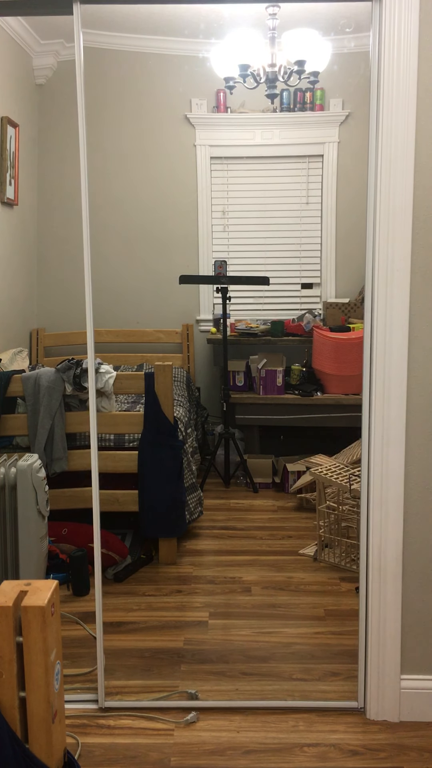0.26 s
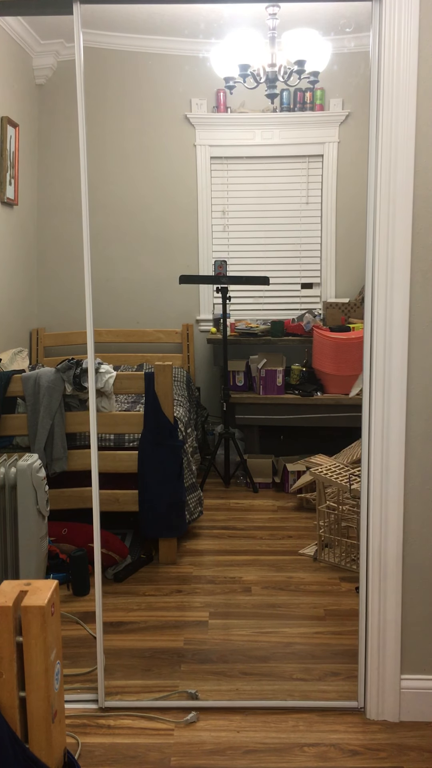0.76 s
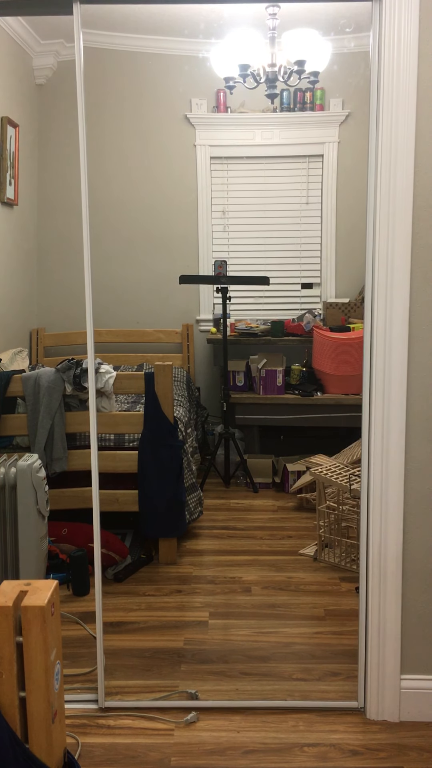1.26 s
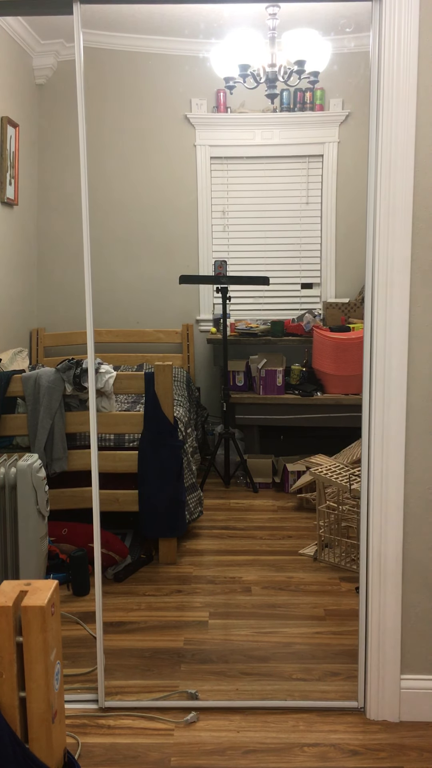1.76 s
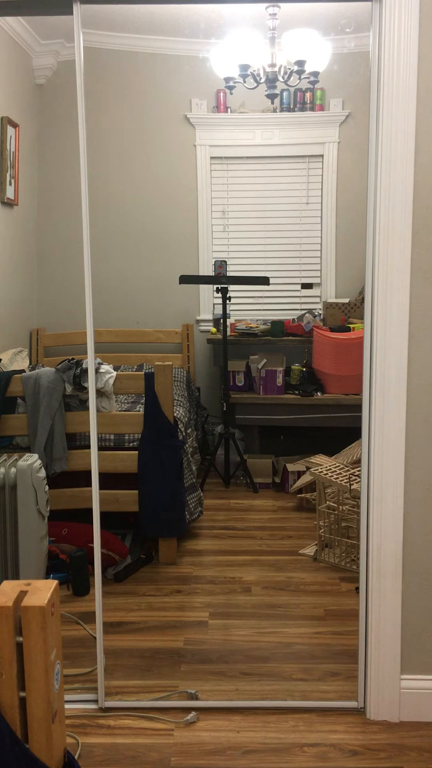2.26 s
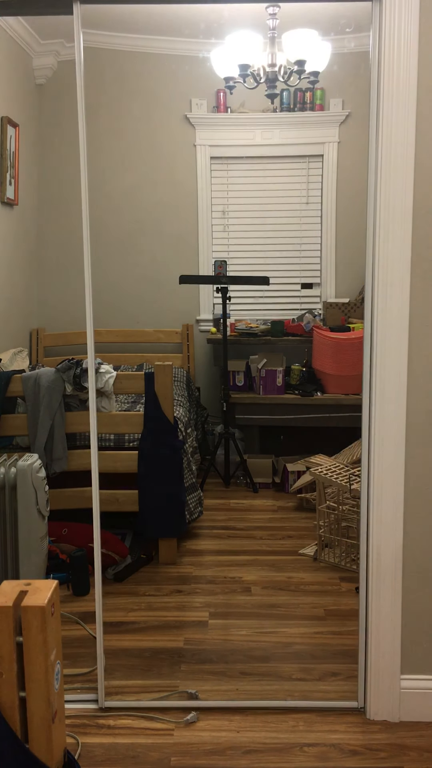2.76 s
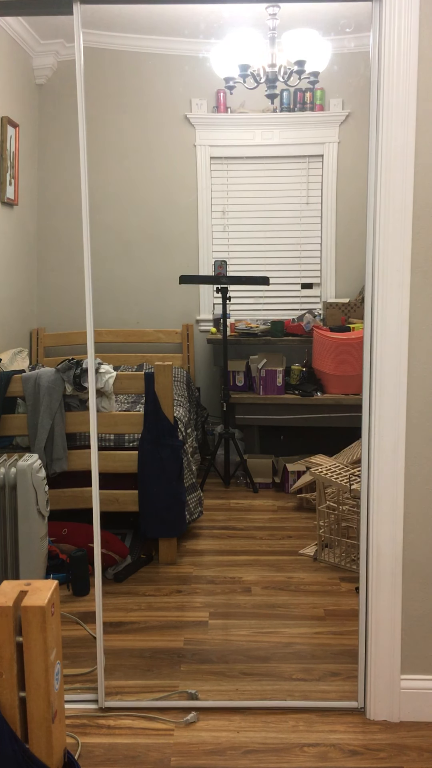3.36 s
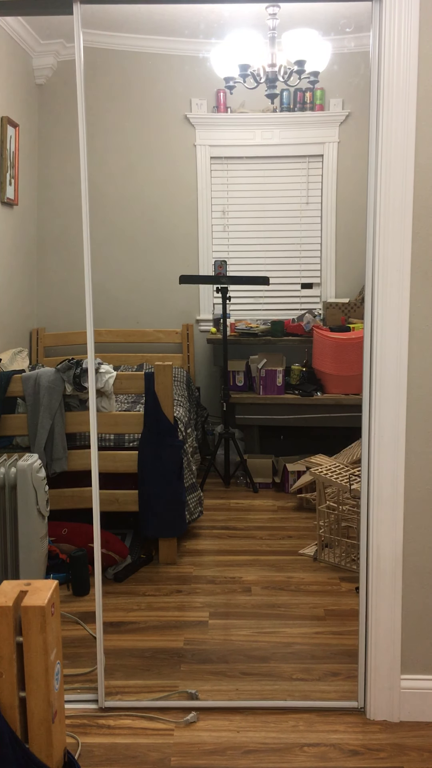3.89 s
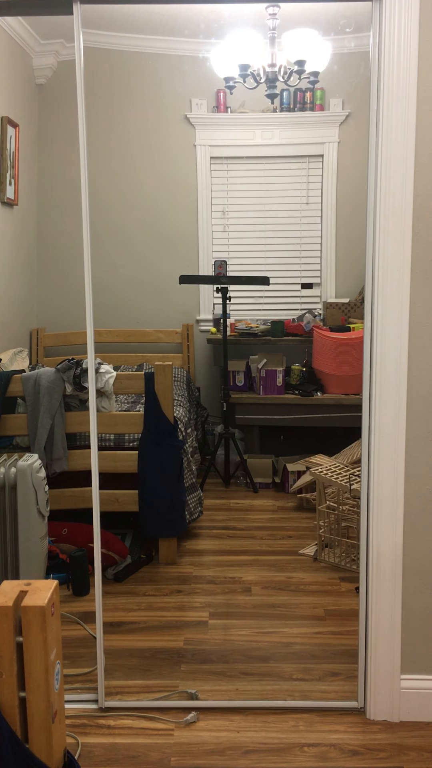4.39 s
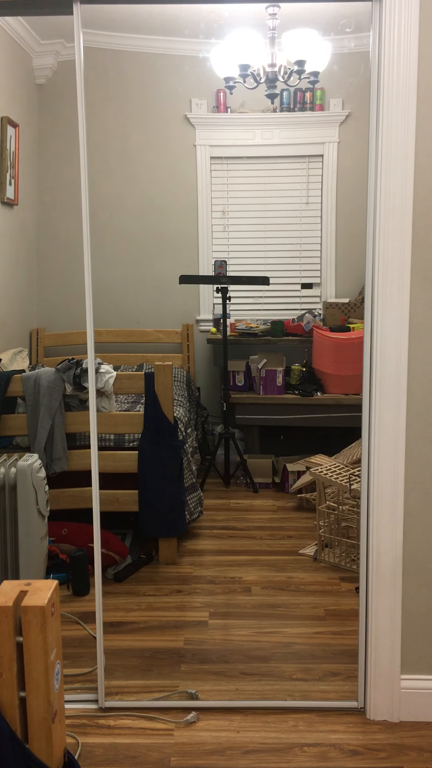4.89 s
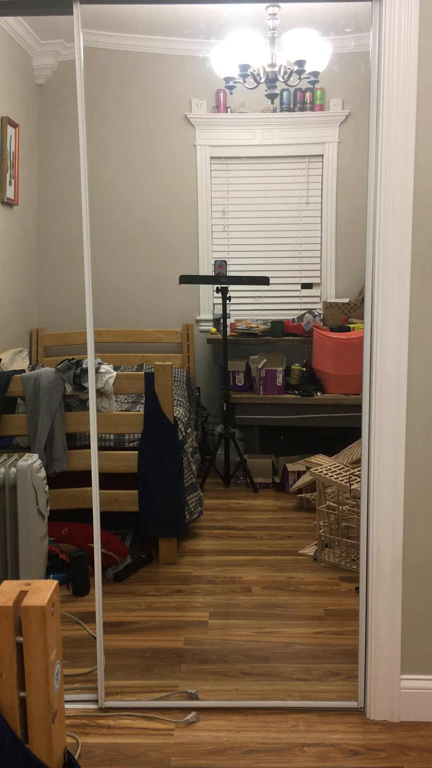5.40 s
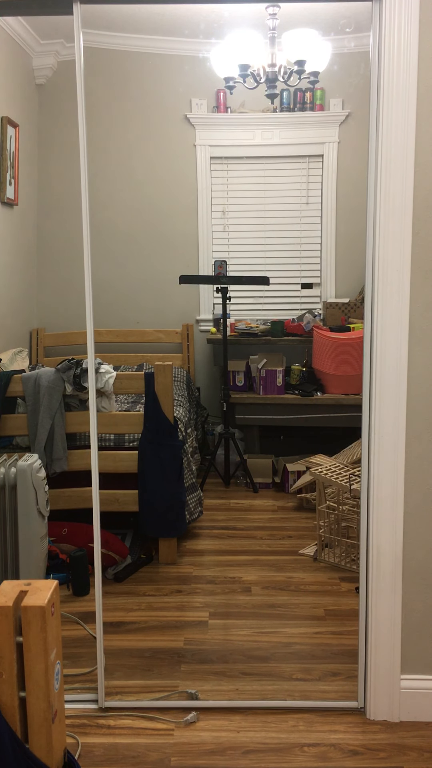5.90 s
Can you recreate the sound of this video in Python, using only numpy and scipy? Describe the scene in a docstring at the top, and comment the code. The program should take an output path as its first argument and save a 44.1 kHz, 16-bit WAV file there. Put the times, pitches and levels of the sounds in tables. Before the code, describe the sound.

Shoes knock and scuff on floorboards, at first in a quick cluster, then more lightly and sparsely. A firm knock comes just before one loud, deep thump as a person lands and shakes the furniture. Another knock and a few soft bounces of the floor follow, and things go quiet. The small room rings briefly with each contact, heard through one microphone with a faint hiss and rustling clothes behind it.

```python
"""Footsteps knock and scuff on a wooden floor in a small, quiet room, then someone lands with a heavy thump.
Each contact is a burst of tiny clicks that sets the boards and the room ringing.
The landing shakes the furniture and makes the joists (the beams under the floor) boom, and the floor
bounces a few times before it settles. Small things chink, a sole squeaks, and behind it all
are a faint hiss, a trembling floor and rustling clothes."""
import sys
import numpy as np
from scipy import signal
from scipy.fft import rfft, irfft
from scipy.io import wavfile

SR = 44100
rng = np.random.default_rng(int(sys.argv[2]) if len(sys.argv) > 2 else 0)


def wav_out(sig):
    """Save sig, one row per channel (or a flat mono array), as 16-bit PCM at SR to the path in sys.argv[1]."""
    wavfile.write(sys.argv[1], SR, np.round(np.clip(np.atleast_2d(sig).T, -1, 1) * 32767).astype(np.int16))


N = 270855

# Feet striking the boards. Each row: start in seconds, contact time in seconds, clack level in dB,
# brightness in dB per octave, weight in dB, board pitch in Hz, struck spot's pitch in Hz, its level in dB.
FOOTFALLS = [ (0.006, 0.019, -47.5, 0, -42, 315.7, 2480, -48),
             (0.232, 0.0067, -77, 2.5, -63.5, 303, 500, -61), (0.385, .008, -83, 0, -61.5, 148, 1300, -85),
             (0.434, 0.018, -82, 7, -69, 143, 1300, -80), (0.519, 0.02, -45, -0.24, -51, 287, 1400, -40.5),
             (0.560, 0.0066, -47.5, 0, -44.5, 306, 2730, -50),
             (0.625, 0.011, -58, 1.5, -43.5, 301, 880, -45), (0.695, .020, -59, 2.5, -61, 113, 1110, -51),
             (0.785, .012, -69, -3, -50.5, 304.7, 785, -63),
             (0.904, 0.0027, -68.5, -3.5, -51, 134.3, 583, -56.5),
             (0.963, 0.0034, -95.5, 11, -55.5, 111.6, 586, -72),
             (1.232, 0.0033, -65, 0, -55.5, 323.5, 865, -55),
             (1.328, 0.0029, -72, -6, -59, 142.6, 980, -61),
             (2.231, 0.0012, -48.5, 2, -45.5, 184.7, 1140, -48),
             (2.391, .004, -66, -2.5, -60, 139.5, 575, -72), (2.750, 0.012, -66.5, -1, -56, 148, 344, -58),
             (2.884, .022, -72, 0.5, -63.5, 147, 490, -61.5),
             (3.173, 0.0023, -43.5, 0.24, -37, 306.7, 444.6, -36.5),
             (3.457, 0.0097, -56, 1, -65, 175, 2450, -54), (3.468, 0.0029, -44.5, 3.5, -44, 185, 2420, -50),
             (3.674, 0.0087, -52.5, -1.5, -35.5, 194.5, 400, -44)]
# Soles sliding. Each row: start in seconds, length in seconds, level in dB,
# brightness in dB per octave, weight in dB.
SCUFFS = [ (0.458, 0.12, -55, -4, -60), (0.571, .097, -47, -.7, -50), (0.701, 0.073, -57.5, -3.5, -60),
          (0.842, 0.088, -66.5, 5.5, -54), (1.556, 0.067, -74.5, 6, -57.5), (1.619, 0.18, -62, 1.5, -69),
          (1.714, .025, -77.5, 1.5, -63), (1.91, .035, -64.5, -2, -76), (2.161, 0.092, -66.5, 2.5, -58),
          (2.473, .17, -67, 0.5, -62), (2.696, .049, -65, 4, -48), (3.145, .028, -69, -0.5, -52),
          (3.402, .08, -65, -3, -56), (5.112, 0.067, -85.5, -8, -58.5), (5.201, .12, -81.5, -10, -66)]
# The colour (balance of low and high) of a clack and of rubbing. Each row: frequency in Hz, level in dB.
CLACK_COLOUR = [(60, -20), (140, -13), (400, -5.5), (900, -1.5), (1800, 0), (6500, 1), (13000, 1.5),
                (16000, -4)]
RUB_COLOUR = [(60, -37), (140, -18), (400, -7), (900, -3.5), (2000, 1.5), (6500, -7), (13000, -2),
              (16000, -16)]
# Soft bounces of the floor after the landing. Each row: start in seconds, board pitch in Hz.
REBOUNDS = [(3.745, 120.7), (3.789, 163), (3.988, 177.1), (4.065, 124.1)]
# The colour of the landing. Each row: frequency in Hz, level in dB.
LANDING_COLOUR = [(41, -30), (70, -11.5), (135, -3), (174, 1), (233, -9.5), (307, -10), (506, -16.5),
                  (606, -16.5), (1370, -21), (1730, -21.5), (2480, -18), (3330, -20), (5890, -24),
                  (13000, -29), (16000, -41.5)]
# Notes of the shaken furniture, the joists and the boards under the landing.
# Each row: pitch in Hz, level in dB, ring time in seconds (the time to fade by 60 dB, called t60).
FURNITURE_NOTES = [(2375, -1, 0.32), (2550, -4.5, 0.46), (2830, 2, 0.17), (3670, -7, 0.19),
                   (3960, -11, 0.27), (4950, -20, 0.253), (5728, -16.5, 0.33), (7157, -13.5, 0.25),
                   (7897, -16.5, 0.29), (8500, -22.5, 0.48), (7900, -13, 0.36), (8930, -17.5, 0.68)]
JOIST_NOTES = [(25.72, -12, 1.0), (33.4, -10, 2.1), (44.5, 3.5, 0.52), (50.1, -2.5, 1.6), (64.3, -3.5, 0.5),
               (114.7, -5, 0.79), (165, -2, 0.75)]
LANDING_HUMS = [(96.5, -33.5, .29), (170.7, -29, 0.24)]
# Weight pressing on the joists. Each row: start in seconds, rise time in seconds, level in dB.
JOIST_LOADS = [(0.021, 0.0062, -41), (0.676, 0.0099, -39), (1.18, 0.01, -40), (2.66, .010, -46.5),
               (3.17, 0.0072, -40), (3.483, 0.0031, -24), (3.606, 0.0059, -36.5)]
# The boards' treble peaks, and their clusters of close notes.
# Each row: pitch in Hz, width in Hz, strength in dB.
BOARD_PEAKS = [(2075, 98, -20), (2430, 10, 1.5), (2970, 40, 1), (3310, 35, -13.5), (3530, 130, -37.5),
               (4260, 18, -3), (5340, 51, -11.5), (5560, 500, -8.5), (5980, 76, 4.5), (6410, 43, 5.5),
               (6870, 120, -7.5), (8740, 51, 0)]
BOARD_CLUSTERS = [(200, 21, -6.5), (306.7, 30, -6), (550, 120, -9.5), (1120, 770, -10.5), (1940, 300, -10),
                  (2450, 200, -10), (2866, 440, -6.5), (3920, 1100, -12), (6300, 450, -12)]
# How far a cluster follows a step's weight instead of its clack. Each row: pitch in Hz, share from 0 to 1.
WEIGHT_SHARE = [(200, .95), (900, 0.3)]
# Small hard things shaken by a step, and one faint squeak of a sole.
# Each row: start in seconds, pitch in Hz, width in Hz, level in dB.
CHINKS = [(0.007, 7250, 606, -45.5), (0.520, 2940, 250, -40.5), (0.557, 9940, 280, -35),
          (0.700, 10150, 400, -48), (3.173, 8900, 698.5, -51.5)]
SQUEAK = (0.4, 2580, 205, -69)
# How long the room rings. Each row: frequency in Hz, ring time in seconds.
ROOM_RING_TIMES = [(60, 0.97), (150, 0.45), (400, 0.44), (1000, 0.43), (2500, 0.4), (6000, 0.43),
                   (10000, 0.38), (15000, 0.42)]
# How much the walker moves. Each row: time in seconds, level in dB.
MOVEMENT = [(0, -59), (2.0, -62), (2.6, -60), (3.0, -64), (4.3, -65.5), (5.5, -72.5), (6.14, -73.5)]
# Colours of the trembling floor, clothes, hiss and microphone. Each row: frequency in Hz, level in dB.
TREMBLE_COLOUR = [(15, -14.5), (45, -0.5), (80, -9), (120, 3.5), (200, -12), (500, -18), (2000, -54)]
CLOTH_COLOUR = [(100, -6.5), (700, -1.5), (1300, 1), (1800, -7.5), (2600, 0), (3600, -13.5), (9000, -10),
                (16000, -8.5)]
HISS_COLOUR = [(13, -41), (22, -11), (55, 3), (83, -12), (169, -19), (242, -12), (263, -21), (636, -33),
               (750, -27), (1230, -33), (1380, -29), (1860, -32), (5030, -34), (13200, -29), (16000, -32)]
MIC_COLOUR = [(4300, 1.5), (4900, -2), (5600, 0), (9300, -1), (10300, -4.5), (11500, -0.5), (14000, -2),
              (16000, -4.5)]

LANDING_S = 3.469
SIZE = 2 ** 15  # samples in one short sound; T holds its times and HZ its frequencies
T, HZ = np.arange(SIZE) / SR, np.maximum(np.arange(SIZE // 2 + 1) * SR / SIZE, 1)
BAND_HZ = 62.5 * 2 ** (np.arange(17) / 2)  # bands half an octave apart


def footsteps(first_click=0.3):
    """Heel and toe strike with a click and a brief crunch; the floor's bounces knock more softly."""
    out = np.zeros(N)
    for start, contact_s, db, brightness, weight_db, board_hz in knocks():
        force = tiny_clicks(np.exp(-T / contact_s), uneven_db=2.5)
        force[0] += first_click * np.sqrt(np.sum(force ** 2))
        crack_db = 8.5 - 3.5 * np.log2(contact_s / .001)  # a shorter contact cracks harder
        band_db = contact_levels(CLACK_COLOUR, db, brightness, weight_db, board_hz)
        add(out, start, through_room(force, band_db, crack_db))
    return out


def knocks(bounce_contact_s=0.023, brightness=0.5):
    """List the footfalls, then the floor's bounces, each lighter than the one before."""
    rows = [row[:-2] for row in FOOTFALLS]
    for start, board_hz in REBOUNDS:
        age_s = start - REBOUNDS[0][0]
        clack_db, weight_db = -71.5 - 42 * age_s, -37 - 44.5 * age_s
        rows.append((start, bounce_contact_s, clack_db, brightness, weight_db, board_hz))
    return rows


def scuffs(spread=0.42):
    """A sliding sole eases on and off the floor, so its rubbing fades in and out."""
    out = np.zeros(N)
    for start, length, db, brightness, weight_db in SCUFFS:
        pressure = np.exp(-.5 * ((T / length - 1) / spread) ** 2)
        force = tiny_clicks(pressure, uneven_db=7.5)
        band_db = contact_levels(RUB_COLOUR, db, brightness, weight_db, board_hz=146)
        add(out, start - length / 2, through_room(force, band_db, crack_db=19))
    return out


def landing(loudest_band_db=-21.5, furniture_db=-35, longest_ring_s=0.44):
    """Many slaps within a few hundredths of a second make one heavy thump that shakes the furniture."""
    colour_db = at(BAND_HZ, LANDING_COLOUR) + 10 * np.log10(BAND_HZ)  # higher bands are wider
    # the floor takes up part of the bass, and the highest treble is lifted a little
    trim_db = at(BAND_HZ, [(200, -3), (350, 0.0019), (7000, 0.0039), (12000, 2)])
    band_db = loudest_band_db + colour_db - colour_db.max() + trim_db
    push = swell(length_s=.026)
    slaps = through_room(tiny_clicks(push, uneven_db=4), band_db, crack_db=15)
    furniture = sum(gain(db) * np.sin(2 * np.pi * (hz * T + rng.random()))
                    * fade(T, min(t60, longest_ring_s)) for hz, db, t60 in FURNITURE_NOTES)
    build_up = np.cumsum(push) / push.sum()  # the furniture swings up while the push lasts
    out = np.zeros(N)
    add(out, LANDING_S, slaps + gain(furniture_db) * furniture * build_up)
    return out


def joist_boom(build_cycles=1.9):
    """Weight bends the floor, which swings at its low notes; a slow push reaches only the lowest."""
    t = np.arange(2 * SR) / SR
    ring = sum(gain(db) * np.sin(2 * np.pi * hz * t) * fade(t, t60) * (1 - np.exp(-t * hz / build_cycles))
               for hz, db, t60 in JOIST_NOTES)
    force = np.zeros(N)
    for start, rise_s, db in JOIST_LOADS:
        push = swell(2 * rise_s)
        add(force, start, gain(db) * push / push.sum())
    return signal.fftconvolve(force, ring)[:N]


def board_hums(ring_s=0.26, bend_delay_s=.012, build_cycles=4.9, waver=0.0069):
    """Each board takes a few cycles to swing up, and wavers in pitch as the load on it shifts."""
    out = np.zeros(N)
    struck = [(start, hz, weight_db - 2, ring_s) for start, _, _, _, weight_db, hz in knocks()]
    landed = [(LANDING_S + bend_delay_s, *note) for note in LANDING_HUMS]
    for start, hz, db, t60 in struck + landed:
        envelope = (1 - np.exp(-T * hz / build_cycles)) * fade(T, t60)
        pitch_hz = hz * (1 + waver * wander(T, every=512))
        phase = 2 * np.pi * np.cumsum(pitch_hz) / SR
        add(out, start, gain(db) * np.sqrt(2) * envelope / envelope.max() * np.sin(phase))
    return out


def board_rings(spot_width_share=0.4):
    """Every footfall rings the boards and the spot it strikes; the landing rings the boards too."""
    out = np.zeros(N)
    for start, _, clack_db, _, weight_db, _, spot_hz, spot_db in FOOTFALLS:
        boards = board_clusters(clack_db, weight_db)
        add(out, start, boards + cluster(spot_hz, spot_width_share * spot_hz, spot_db))
    add(out, LANDING_S + .006, board_clusters(clack_db=-36, weight_db=-23.5))
    return out


def board_clusters(clack_db, weight_db):
    """Weight mostly drives the boards' low notes, and the clack their high ones."""
    return sum(cluster(hz, width, db + clack_db + at(hz, WEIGHT_SHARE) * (weight_db - clack_db))
               for hz, width, db in BOARD_CLUSTERS)


def chinks_and_squeak():
    """Small hard things chink when a step shakes them, and a sole squeaks once."""
    out = np.zeros(N)
    for start, hz, width, db in CHINKS + [SQUEAK]:
        add(out, start, cluster(hz, width, db))
    return out


def cluster(hz, width, db, room_time_share=0.89):
    """Notes close in pitch throb unevenly together and die a little sooner than the room."""
    notes = irfft(rfft(rng.standard_normal(SIZE)) * peak(hz, width))
    envelope = (1 - np.exp(-T * width)) * fade(T, room_time_share * at(hz, ROOM_RING_TIMES))
    ring = notes * envelope
    return gain(db) * ring * envelope.std() / ring.std()


def contact_levels(colour, db, brightness, weight_db, board_hz):
    """Each band's level in dB for one contact: surface noise over a thud around the board's pitch."""
    surface_db = db + at(BAND_HZ, colour) + brightness * np.log2(BAND_HZ / 1800)
    octaves = np.log2(BAND_HZ / board_hz)
    thud_db = weight_db - 1.5 - np.maximum(15 * octaves, -4.5 * octaves)  # falls faster above the pitch
    return 20 * np.log10(np.hypot(gain(surface_db), gain(thud_db)))


def through_room(force, band_db, crack_db, build_cycles=0.74, echo_db=5, span_s=0.026):
    """A force rings boards and room; band_db is each band's level if its energy fell within span_s."""
    centre = BAND_HZ[:, None]
    bands = np.sqrt(np.clip(1 - 2 * abs(np.log2(HZ / centre)), 0, 1))
    boards = 1 + sum(gain(1 + db / 2) * peak(hz, width) for hz, width, db in BOARD_PEAKS)
    band_noise = irfft(rfft(rng.standard_normal(SIZE)) * boards * bands)
    # the direct crack comes first, then the room; low notes need longer to build up
    decay = fade(T, at(centre, ROOM_RING_TIMES)) + gain(crack_db) * fade(T, t60=0.0067)
    decay *= 1 - np.exp(-T * centre / build_cycles)
    # every click starts its own decay, and their energies add
    energy = abs(irfft(rfft(decay ** 2) * rfft(force ** 2)))
    heard = band_noise * np.sqrt(energy)
    # in the treble the early echoes stand apart; later ones merge
    heard[BAND_HZ > 1200] *= gain(echo_db * fade(T, t60=.4) * wander(T, every=16))
    power = np.sum(heard ** 2, axis=1) / (span_s * SR)
    return (gain(band_db) / np.sqrt(2 * power)) @ heard


def background(flutter_db=4.5):
    """Faint even hiss; while the walker moves, the floor trembles and clothes rustle in fits."""
    t = np.arange(N) / SR
    movement = gain(np.interp(t, *np.transpose(MOVEMENT)))
    fits = gain(flutter_db * wander(t, every=2500))
    rustle = noise(CLOTH_COLOUR, db=-11) * fits
    return noise(HISS_COLOUR, db=-67) + movement * (noise(TREMBLE_COLOUR, db=0) + rustle)


def noise(colour, db):
    """Steady noise with a given colour and average level."""
    hz = np.maximum(np.arange(N // 2 + 1) * SR / N, 1)
    x = irfft(rfft(rng.standard_normal(N)) * gain(at(hz, colour)), N)
    return x * gain(db) / x.std()


def tiny_clicks(envelope, uneven_db):
    """Tiny clicks of very unequal size that follow a loudness curve."""
    return envelope * rng.standard_normal(SIZE) * gain(uneven_db * rng.standard_normal(SIZE))


def swell(length_s):
    """A force that rises and falls once, with soft ends."""
    return np.sin(np.pi * np.minimum(T / length_s, 1)) ** 2


def wander(t, every):
    """A curve that moves to a new random value every so many samples."""
    return np.interp(t, t[::every], rng.standard_normal(len(t[::every])))


def peak(hz, width):
    """A filter shape that favours frequencies near one pitch."""
    return 1 / (1 + (2 * (HZ - hz) / width) ** 2)


def fade(t, t60):
    """A smooth decay, 60 dB down after t60 seconds."""
    return np.exp(-np.log(1000) * t / t60)


def gain(db):
    """Turn decibels into a multiplier."""
    return 10 ** (np.asarray(db) / 20)


def at(hz, points):
    """Read between (Hz, value) rows, with octaves evenly spaced."""
    row_hz, value = np.transpose(points)
    return np.interp(np.log(hz), np.log(row_hz), value)


def add(out, start, x):
    """Mix x into out from start, in seconds."""
    i = int(start * SR)
    out[i:i + len(x)] += x[:len(out) - i]


def scene():
    """All sources at one microphone."""
    walking = footsteps() + scuffs() + board_hums() + board_rings() + chinks_and_squeak()
    return (walking + landing() + joist_boom() + background())[None]


def record(dry, top_hz=15900):
    """The phone's microphone opening dents the treble, and the very top is cut off."""
    mic_response = np.fft.fftshift(irfft(gain(at(HZ, MIC_COLOUR))))
    heard = signal.fftconvolve(dry, mic_response[None, 1:], mode="same")
    return signal.sosfilt(signal.ellip(10, .2, 70, top_hz, fs=SR, output="sos"), heard)


dry = scene()
out = record(dry)
wav_out(out)
```